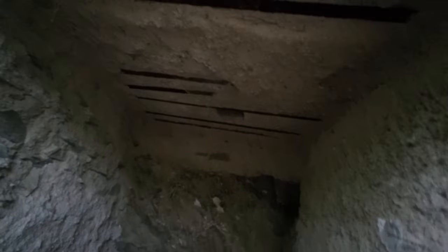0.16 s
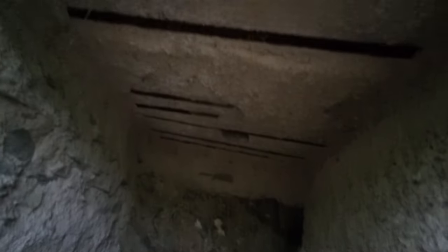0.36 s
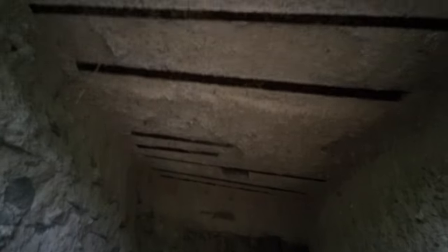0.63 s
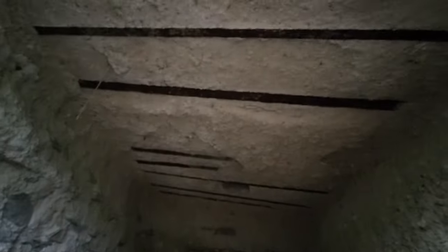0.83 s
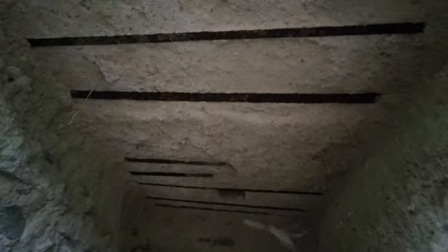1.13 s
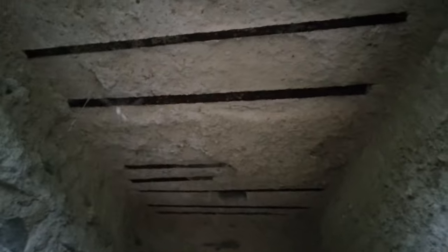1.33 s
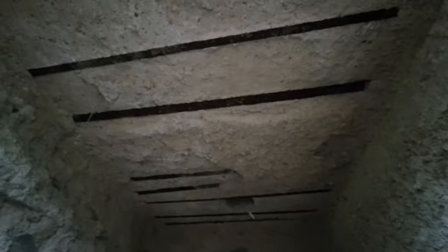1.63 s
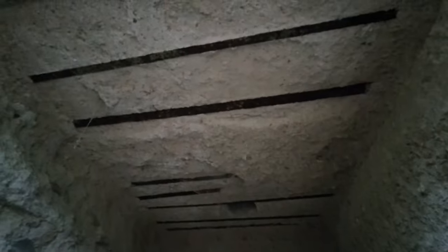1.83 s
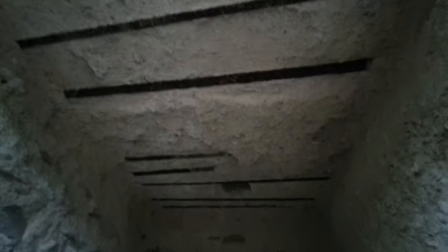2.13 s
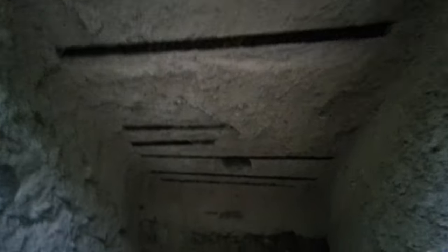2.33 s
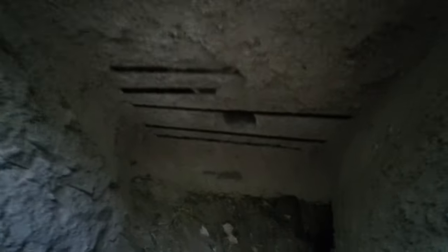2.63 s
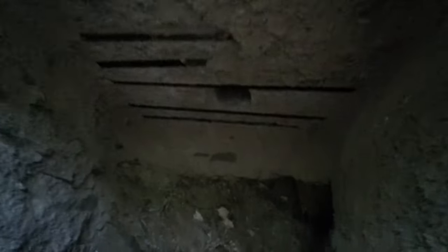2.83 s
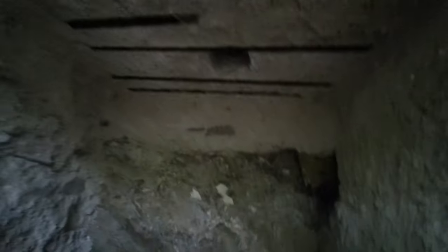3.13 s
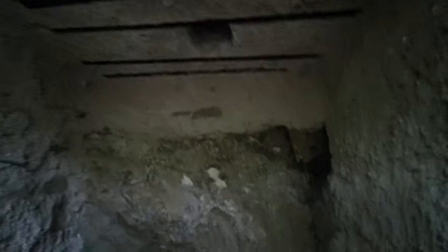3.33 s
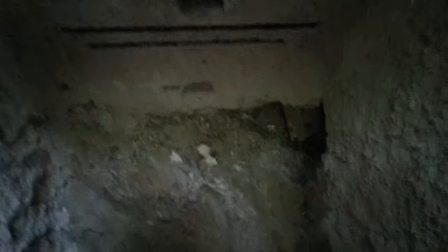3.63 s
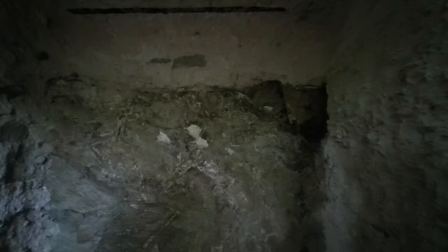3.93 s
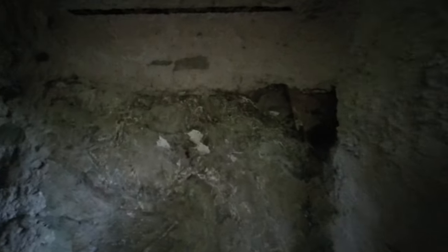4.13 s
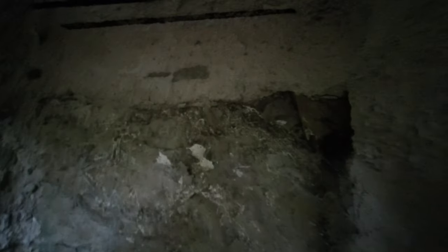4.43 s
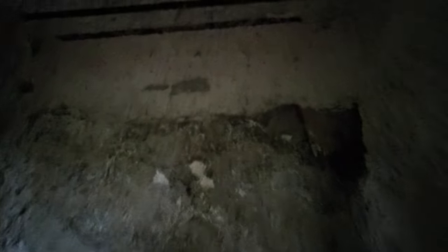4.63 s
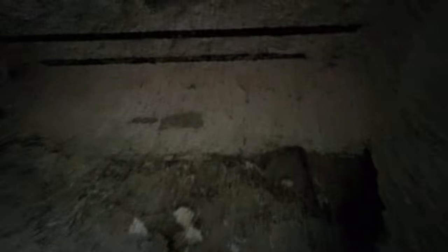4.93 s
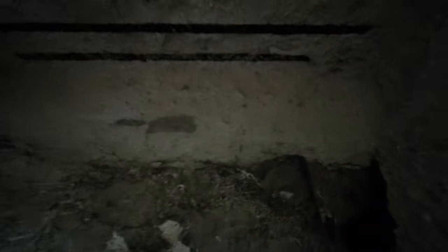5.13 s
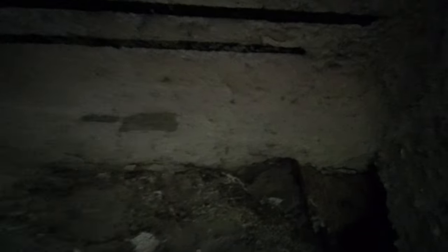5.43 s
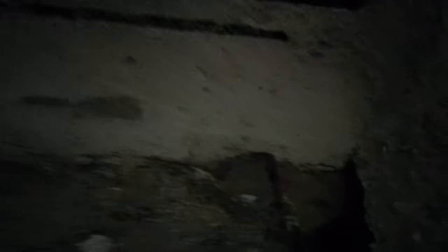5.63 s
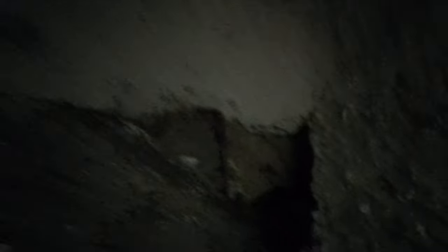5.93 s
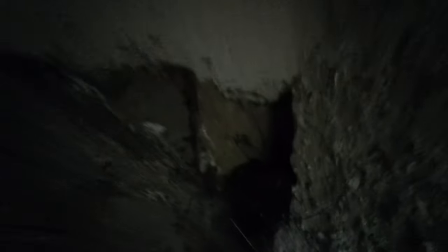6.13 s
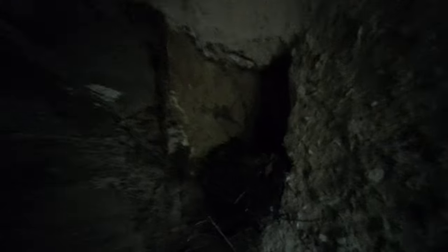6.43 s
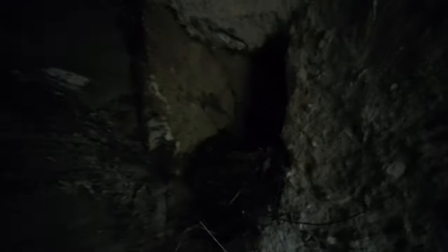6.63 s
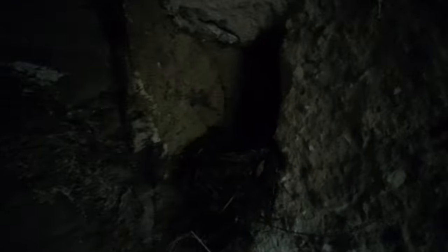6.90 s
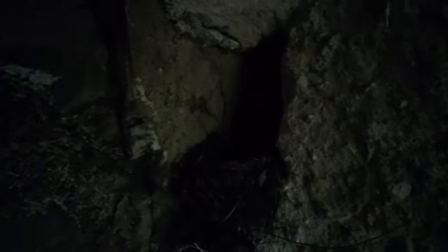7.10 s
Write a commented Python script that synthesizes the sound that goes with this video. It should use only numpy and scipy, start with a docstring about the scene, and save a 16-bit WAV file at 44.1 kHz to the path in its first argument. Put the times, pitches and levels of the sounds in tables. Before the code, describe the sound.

In a small enclosed stone chamber, boots shift over loose rubble close to a hand-held camera. The first 1.3 seconds are quiet: soft gritty dragging fading almost to nothing over faint hiss. From about 1.45 to 1.9 a flat stone grinds brightly on grit, swelling into a crunch near 1.95 and a sharp crack at 2.2. Softer scraping follows, then loud, hard stone clacks at 3.1. A strong crunch comes at 3.4 with a low thud, then another thud at 3.6 and hollow knocks at 3.8. The heaviest, dullest heel thud lands at 4.5 amid shifting rubble. It calms until a crisp crunch and low boom at 5.7. A softer step and deep drone rise around 6.1, then crunches with low thuds at 6.7 to 6.9 trail into gritty settling by 7.2. Reverberation is short, the tone boxy.

```python
"""Boots scrape and crunch over loose rubble in a small stone chamber, close to a hand-held camera.
Grit is clumped noise that swells with each crunch; single stones snap and knock in short bursts.
Heel thuds are sagging sines that wake the chamber's low modes, and decaying noise forms its tail.
The camera housing colours grit, stones and tail with its resonances, above a low drone and faint hiss."""
import sys
import numpy as np
from scipy import signal
from scipy.fft import rfft, irfft, next_fast_len
from scipy.io import wavfile
from scipy.ndimage import uniform_filter1d, map_coordinates

SR = 44100
rng = np.random.default_rng(int(sys.argv[2]) if len(sys.argv) > 2 else 0)


def voltage_ratio(decibels):
    """Convert decibels (scalar or array-like) to amplitude ratios, 20 dB per decade."""
    exponent = np.asarray(decibels, float) / 20
    return 10 ** exponent


def materialize(psi):
    """Save the field psi as 16-bit PCM at rate SR to the path in sys.argv[1].

    A 1-D psi becomes a single channel; in a 2-D psi each row is a channel.
    """
    bounded = np.clip(np.atleast_2d(psi).T, -1, 1)
    quanta = np.round(bounded * 32767).astype(np.int16)
    wavfile.write(sys.argv[1], SR, quanta)


N = 320166  # length in samples


def unit(x):
    """Scaled to rms 1."""
    return x / np.sqrt(np.mean(x ** 2) + 1e-20)


def filtered(x, response):
    """x passed through a complex response of frequency in Hz."""
    size = next_fast_len(N + SR // 2)
    hz = np.fft.rfftfreq(size, 1 / SR)
    return irfft(rfft(x, size) * response(hz), size)[:N]


def along(points, hz):
    """Reads a curve of (Hz, value) points on a log frequency axis."""
    point_hz, value = np.transpose(points)
    return np.interp(np.log(hz + 1), np.log(point_hz + 1), value)


def coloured_noise(spectrum, strength=1):
    """White noise, scaled by strength, then shaped to a spectrum in dB."""
    return filtered(strength * rng.standard_normal(N), lambda f: voltage_ratio(along(spectrum, f)))


def wobble(rate):
    """A smooth random curve, rate knots a second."""
    knots = rng.standard_normal(int(N * rate / SR) + 4)
    return map_coordinates(knots, [np.arange(N) * rate / SR])


def curves(rows):
    """One value per sample for each column after the time."""
    seconds, *columns = np.transpose(rows)
    return [np.interp(np.arange(N) / SR, seconds, column) for column in columns]


def resonances(modes, f):
    """Causal second-order resonances of alternating sign, summed."""
    total = 0
    for k, (centre, width, db) in enumerate(modes):
        damping = 1j * f * width
        total = total + (-1) ** k * voltage_ratio(db) * damping / (centre ** 2 - f ** 2 + damping)
    return total


# Spectrum of the microphone's noise. Each row: frequency in Hz, relative level in dB.
HISS_SPECTRUM = [(12, -55), (20, 3), (41, -7), (116, -1.5), (158, -18.5), (923, -16.5), (1150, -24.5),
                 (5530, -24.5), (6180, -43), (6720, -26), (16000, -31.5)]
# Steady whine of the electronics. Each row: frequency in Hz, peak level in dB.
WHINE_TONES = [(6002, -86)]


def hush():
    """The microphone's own noise, shaped hiss, and a faint steady sine from the electronics."""
    sound = voltage_ratio(-69.5) * unit(coloured_noise(HISS_SPECTRUM))
    for hz, db in WHINE_TONES:
        sound += voltage_ratio(db) * np.sin(2 * np.pi * hz * np.arange(N) / SR)
    return sound


# Loudness of the chamber's air. Each row: time in seconds, drone level in dB.
DRONE_LEVEL = [(0, -77), (1.6, -82), (1.9, -59.5), (2.35, -74), (2.5, -90), (3.4, -93), (5.0, -77),
               (6.1, -58), (7.26, -66.5)]
# Fuzzy lines of the drone. Each row: centre in Hz, width in Hz, relative level in dB.
DRONE_LINES = [(57.3, 7.8, -4), (115, 7.2, -2)]


def air_drone():
    """The air of the chamber drones at its deepest modes: noise through narrow resonances."""
    level_db, = curves(DRONE_LEVEL)
    # the divisor rolls the lines off above 160 Hz
    drone = filtered(rng.standard_normal(N), lambda f: resonances(DRONE_LINES, f) / (1 + (f / 160) ** 4))
    return voltage_ratio(level_db) * unit(drone)


# How fast the stone walls' answer dies. Each row: frequency in Hz, time to fall 60 dB in seconds.
WALL_DECAY = [(200, 0.44), (1000, 0.23), (4000, 0.026), (12000, 0.076)]


def walls(x):
    """Each frequency of the chamber's tail dies at its own speed; a new tail as the walker moves."""
    out, hop = np.zeros(N + 2 * SR), SR // 4
    for start in range(0, N, hop):
        hz, t, bins = signal.stft(rng.standard_normal(SR // 3), SR, nperseg=256)
        decay = voltage_ratio(-60 * t / along(WALL_DECAY, hz)[:, None])
        tail = signal.istft(bins * decay, SR, nperseg=256)[1]
        wet = signal.fftconvolve(x[start:start + hop], tail / np.linalg.norm(tail))
        out[start + SR // 200:][:len(wet)] += wet  # 5 ms behind the direct sound
    return out[:N]


# Resonances of the camera housing. Each row: centre in Hz, width in Hz, level in dB.
HOUSING_MODES = [(512, 273, -6.5), (848, 241, 1.5), (1882, 335, -1), (3206, 261, 3), (4330, 1170, -9),
                 (6570, 1560, -1.5), (7715, 970, -3), (9240, 520, -4), (10110, 650, -9.5), (12340, 890, -4),
                 (15100, 570, -31)]


def housing(f):
    """Response of the housing in front of the microphone: a weak direct path plus its resonances."""
    return 0.19 + resonances(HOUSING_MODES, f)


def turning(x):
    """As hand and camera turn, the housing's colour drifts between a lower and a higher tuning."""
    sway = .025  # share of detuning at the lowest frequencies, less higher up
    share = .5 + .5 * np.tanh(wobble(5))
    down = filtered(x, lambda f: housing(f * (1 + sway * 1000 / (1000 + f / 2))))
    up = filtered(x, lambda f: housing(f * (1 - sway * 1000 / (1000 + f / 2))))
    return share * down + (1 - share) * up


# Low modes of the chamber. Each row: frequency in Hz, relative level in dB, time to fall 60 dB in seconds.
CHAMBER_MODES = [(96, -10, 0.42), (110.7, -6.5, 0.46), (142.5, -7.5, 0.51)]
# Heel thuds. Each row: start in seconds, level in dB, settled pitch in Hz,
# time to fall 60 dB in seconds, chamber boom relative to the blow in dB.
HEEL_THUDS = [(2.233, -33.5, 330, 0.1, -18), (2.245, -34, 218, 0.12, -16), (3.386, -26, 205.3, 0.18, -5.5),
              (3.39, -36, 54.3, 0.23, -23), (3.639, -21.5, 201, 0.13, -23), (3.77, -38.5, 127, 0.14, -5),
              (4.352, -36, 173, 0.12, -15), (4.409, -33.5, 130, 0.13, 1), (4.469, -14.5, 185, 0.09, -14),
              (4.472, -18.5, 314.5, 0.12, -32), (4.493, -23, 230, 0.052, -30),
              (4.639, -31.5, 188, 0.19, -11), (5.724, -27, 94.6, 0.54, -4), (5.724, -33, 272, 0.091, -30),
              (6.04, -40.5, 336, 0.14, -6), (6.06, -44, 143.5, 0.55, -14), (6.726, -35.5, 138.3, 0.37, -1),
              (6.769, -30, 94.5, 0.29, -1.5), (6.859, -32, 94.6, 0.29, -6)]


def thuds():
    """A soft blow rings the ground briefly at a sagging pitch, and the chamber longer at its own modes."""
    out, t = np.zeros(N + SR), np.arange(SR) / SR
    for start, db, hz, t60, boom_db in HEEL_THUDS:
        phase = 2 * np.pi * hz * (t + 0.0019 * (1 - np.exp(-t / 0.0023)))
        blow = voltage_ratio(-60 * t / t60) * np.sin(phase)
        for mode_hz, mode_db, life in CHAMBER_MODES:
            uneven_db = rng.normal(0, 1.85)  # no two thuds wake a mode alike
            boom = voltage_ratio(boom_db + mode_db + uneven_db - 60 * t / life)
            blow += boom * np.sin(2 * np.pi * mode_hz * t)
        soft_onset = 1 - np.exp(-t / 0.011)
        out[round(start * SR):][:SR] += voltage_ratio(db) * blow * soft_onset
    return out[:N]


# Stones cracking and knocking. Each row: start in seconds, snap level in dB, knock level in dB,
# knock pitch in Hz, time for crumbs and rattle to fall 60 dB in seconds; the parts have further gains.
STONE_CRACKS = [(1.9623, -45, -23.5, 5000, 0.018), (2.171, -30, -46, 1920, 0.033),
                (2.1879, -23, -38, 1940, 0.29), (2.3995, -48, -35, 4600, .02),
                (2.2307, -10, -24.5, 810, 0.077), (2.233, -45, -29, 1800, 0.06),
                (2.243, -45, -26, 940, .05), (3.055, -48, -34, 1940, 0.46), (3.0700, -9, -17.5, 1940, 0.1),
                (3.079, -50, -15.5, 3160, 0.039), (3.0800, -50, -9, 2000, 0.02),
                (3.083, -50, -29.5, 960, .1), (3.089, -40, -24, 3270, .04), (3.198, -35, -32, 3270, 0.1),
                (3.203, -50, -32.5, 1100, 0.085), (3.246, -52, -30, 910, 0.06),
                (3.374, -40, -28, 1890, 0.041), (3.407, -45, -19, 780, 0.048),
                (3.499, -29, -22, 1680, 0.017), (3.7745, -45, -10.5, 780, 0.024),
                (3.775, -19.5, -21.5, 2700, 0.033), (3.7822, -38, -13.5, 755, 0.05),
                (3.795, -45, -27, 905, .05), (3.897, -33, -41, 1540, 0.049),
                (4.1374, -54, -28.5, 1650, 0.0046), (4.349, -32.5, -21, 1360, 0.036),
                (4.355, -43, -25.5, 940, 0.11), (4.9184, -49, -31, 1240, 0.074),
                (5.08, -55, -41, 5500, .03), (5.661, -39, -42, 1920, 0.06), (6.041, -55, -33, 900, .08),
                (6.551, -48, -41, 2600, 0.055), (6.658, -39, -27.5, 1740, .05),
                (6.917, -53, -29, 4260, 0.022), (6.9928, -53, -34, 1690, 0.17)]


def cracks():
    """A sharp bright snap with crumbs dying after it, and the stone's own knock: small high, big low."""
    snaps, knocks, t = np.zeros(N + SR), np.zeros(N + SR), np.arange(SR // 4) / SR
    for start, snap_db, knock_db, hz, t60 in STONE_CRACKS:
        snap_noise, knock_noise = rng.standard_normal((2, len(t)))
        at = slice(round(start * SR), round(start * SR) + len(t))
        tail = voltage_ratio(-60 * t / t60)
        snap = 1.7 * voltage_ratio(-60 * t / .0038)
        snaps[at] += voltage_ratio(snap_db) * (snap + 0.34 * tail) * snap_noise
        band = signal.butter(2, [hz / 2.23, hz * 1.85], "band", fs=SR)
        rattle = unit(signal.lfilter(*band, knock_noise))
        ring = np.sin(2 * np.pi * hz * t) * np.exp(-(t / 0.0039) ** 2)  # dry stone: soon damped
        click = voltage_ratio(-60 * t / 0.0082) * rattle
        knock = 0.76 * ring + 0.51 * click + 0.33 * tail * rattle
        knocks[at] += voltage_ratio(knock_db) * (1 - np.exp(-t / 0.00096)) * knock
    bright = signal.butter(2, 5000, "high", fs=SR, output="sos")
    return signal.sosfilt(bright, snaps[:N]) + knocks[:N]


def pebbles():
    """Small stones under the sole knock at random, each a few damped swings at its own pitch and size."""
    per_second, middle_hz, decay_swings, smallest_db = 150, 1300, 2.5, -1
    when, pitch, size = rng.random((3, int(per_second * N / SR), 1))
    # pitches lie within an octave either side of the middle
    swings = middle_hz * 4 ** (pitch - .5) * np.arange(512) / SR
    level = voltage_ratio(smallest_db - 4 * np.log(1 - .99 * size))
    knocks = level * np.sin(2 * np.pi * swings) * np.exp(-swings / decay_swings)
    at = (when * N).astype(int) + np.arange(512)
    return np.bincount(at.ravel(), knocks.ravel(), N)[:N]


def grit(spectrum, spread_db, clump_db, hz):
    """Countless tiny breaks of very uneven size, arriving in clumps; rms 1 after the housing."""
    sizes_db = spread_db * np.minimum(rng.exponential(size=N), 5.5)
    breaks = coloured_noise(spectrum, voltage_ratio(sizes_db + clump_db * wobble(hz)))
    return breaks / np.std(filtered(breaks, housing))


# A flat stone sliding on grit: start in seconds, end in seconds, level at start in dB, level at end in dB.
STONE_SLIDE = (1.45, 1.88, -51, -56)
# Colour of the slide before the housing. Each row: frequency in Hz, density in dB per Hz.
SLIDE_SPECTRUM = [(3400, -40), (4300, 0), (5200, 4), (6600, -6), (8000, -30)]


def slide():
    """A flat stone slides on grit: a steady bright grind that fades in and out."""
    start, end, first_db, last_db = STONE_SLIDE
    fade_s, t = .06, np.arange(N) / SR
    gate = np.clip(np.minimum(t - start, end - t) / fade_s + .5, 0, 1)
    level = voltage_ratio(np.interp(t, [start, end], [first_db, last_db]))
    return gate * level * grit(SLIDE_SPECTRUM, spread_db=2.0, clump_db=2.0, hz=70.5)


def patchy(x, depth_db):
    """Different stones under the sole: the colour shifts in random patches of time and frequency."""
    bins = signal.stft(x, nperseg=512)[2]
    field = uniform_filter1d(rng.standard_normal(bins.shape), size=9, axis=0)
    field = uniform_filter1d(field, size=8, axis=1)
    return signal.istft(bins * voltage_ratio(depth_db * unit(field)), nperseg=512)[1][:N]


# The heap giving way under a step. Each row: peak time in seconds, peak level in dB,
# rise over 20 dB in seconds, fall over 20 dB in seconds, fine dust relative to the peak in dB,
# shifting weight relative to the peak in dB.
STEP_CRUNCHES = [(.55, -55.5, 0.2, 0.12, -5.5, -9), (1.72, -45, 0.12, 0.031, -15, -16),
                 (1.941, -38.5, 0.092, 0.088, -4.5, -27), (2.243, -42.5, 0.051, 0.094, -4.5, -2.5),
                 (2.781, -51.5, 0.32, 0.14, -2.5, -17), (2.956, -43.5, 0.11, 0.073, -7.5, -9.5),
                 (3.26, -51, 0.052, 0.14, -1, -18), (3.403, -33.5, 0.068, 0.07, -5, -6),
                 (3.5, -38.5, 0.079, 0.078, -5.5, -6.5), (3.72, -46.5, 0.2, 0.14, -4, -1),
                 (3.84, -49, 0.12, 0.028, -0.5, -22), (4.09, -50.5, 0.017, 0.026, -2, -4.5),
                 (4.414, -40, 0.02, 0.069, -7, -10), (4.491, -42, 0.052, 0.09, -7.5, 2.5),
                 (4.6, -43, 0.064, 0.081, -7.5, 1.5), (5.03, -51.5, 0.11, 0.035, -22, -3.5),
                 (5.715, -35.5, 0.056, 0.095, -6.5, -7), (5.83, -54.5, .05, 0.047, 0, -1.5),
                 (6.05, -48, 0.17, 0.15, -9, -11), (6.2, -55, 0.034, 0.055, -16, -7),
                 (6.555, -52, 0.048, 0.065, -25, -6), (6.7, -44, 0.088, 0.16, -1, -27),
                 (6.775, -36.5, 0.12, 0.049, -7, -12), (6.879, -40, 0.11, 0.085, -4, -13),
                 (7.01, -51.5, 0.14, 0.04, -7, -8)]


def swells(shift_s, peaks_db):
    """Power of all crunches: each climbs to its peak and falls away at its own pace."""
    roundness = 1.49  # 1 = pointed peak, 2 = bell
    peak_s, _, rise, fall, _, _ = np.transpose(STEP_CRUNCHES)[:, :, None]
    coarse_steps = np.arange(0, N, 32)
    t = coarse_steps / SR - shift_s - peak_s
    drop_db = 20 * np.maximum(-t / rise, t / fall) ** roundness
    power = voltage_ratio(peaks_db[:, None] - drop_db) ** 2
    return np.interp(np.arange(N), coarse_steps, power.sum(0))


# Soft noise bed between the crunches: the sole dragging on rubble, with faint breath-like hiss
# near 0.8 and 5.6 s. Each row: time in seconds, coarse noise in dB,
# fine noise relative to it in dB, dull noise relative to it in dB.
NOISE_BED = [(0, -51.5, -7, -6.5), (.3, -58.5, -6, -5), (.72, -62.5, -3, -2), (.9, -61, 2, -3.5),
             (1.22, -75.5, -8.5, 1.5), (1.38, -60, -4.5, -5), (1.45, -45.5, -1.5, -13),
             (1.86, -46.5, -5, -9.5), (2.1, -50.5, -5.5, -8), (2.45, -52.5, -4.5, -7),
             (2.55, -60.5, -9, -5.5), (3.03, -58.5, -2.5, 0), (3.1, -54.5, -3, 9), (3.19, -59.5, -3, -5),
             (3.55, -46.5, -7.5, 0), (3.95, -47.5, -9, -11.5), (4.02, -52, -6.5, -6.5),
             (4.28, -51.5, -7.5, -9.5), (4.36, -57.5, -7, 6.5), (4.45, -50.5, -11, -2),
             (4.66, -47.5, -4.5, 5), (4.71, -54.5, -10.5, -2.5), (5.06, -53.5, -5.5, -10),
             (5.14, -62.5, -11.5, -3), (5.62, -64, 2.5, -5.5), (5.9, -56.5, -12, -10),
             (6.15, -61.5, -4, -5), (6.4, -69, -7.5, -1), (6.62, -54.5, -12.5, -7), (7.26, -59, -5.5, -9)]
# Coarse grit before the housing. Each row: frequency in Hz, density in dB per Hz.
COARSE_SPECTRUM = [(150, -4.5), (400, 0.5), (1000, 1.5), (2000, -2), (3500, -10.5), (5000, -21),
                   (9000, -59)]
# Fine dust before the housing. Each row: frequency in Hz, density in dB per Hz.
DUST_SPECTRUM = [(1500, -32), (3500, -3), (5000, -1), (8000, -7), (12000, -9), (16000, -14.5)]
# Dull shifting of the heap. Each row: frequency in Hz, density in dB per Hz.
HEAP_SPECTRUM = [(40, -34), (80, -10), (150, 5.5), (250, 6.5), (450, 4), (700, -32)]


def tread():
    """Coarse grit, fine dust, pebbles and the dull shifting heap follow the soft bed and the crunches."""
    level, dust, weight = curves(NOISE_BED)
    _, db, _, _, dust_db, weight_db = np.transpose(STEP_CRUNCHES)
    grit_level = np.sqrt(voltage_ratio(level) ** 2 + swells(0, db))
    # in a crunch dust flies first, the heap settles after
    dust_level = np.sqrt(voltage_ratio(level + dust) ** 2 + swells(-0.0045, db + dust_db))
    heap_level = np.sqrt(voltage_ratio(level + weight) ** 2 + swells(0.013, db + weight_db))
    slips = voltage_ratio(.7 * wobble(30))  # the sole sticks and slips
    coarse = slips * grit_level * grit(COARSE_SPECTRUM, spread_db=3, clump_db=1.0, hz=60.15)
    fine = slips * dust_level * grit(DUST_SPECTRUM, spread_db=3, clump_db=1.5, hz=89.5)
    heap = heap_level * unit(coloured_noise(HEAP_SPECTRUM, voltage_ratio(2.85 * wobble(25))))
    grind = patchy(coarse + fine + slide(), depth_db=1.2) + grit_level * pebbles()
    return grind, heap


def scene():
    """Steps in the chamber: grind and tail through the drifting housing, stones through the still one."""
    grind, heap = tread()
    stones = cracks()
    tail = walls(voltage_ratio(-11.5) * stones + voltage_ratio(-15.0) * grind)
    coloured = turning(grind + tail) + filtered(stones, housing)
    mix = coloured + heap + thuds() + air_drone() + hush()
    return mix[None]


def top_cut(x):
    """Nothing passes above the cut-off."""
    return signal.sosfilt(signal.butter(12, 16660, fs=SR, output="sos"), x)


def record(dry):
    """The treble is cut steeply in two steps between about 15.5 and 16.7 kHz."""
    def treble_cut(f):
        return np.interp(f, [15450, 15550, 16600, 16700], [1, .2, .1, 0])
    mix = filtered(dry[0], treble_cut)[None]
    return top_cut(mix)


dry = scene()
out = record(dry)
materialize(out)
```